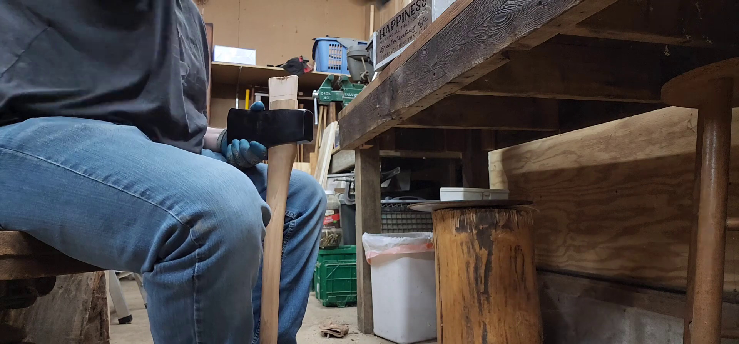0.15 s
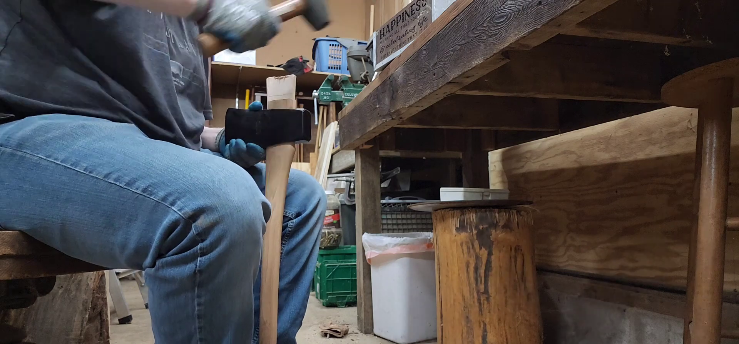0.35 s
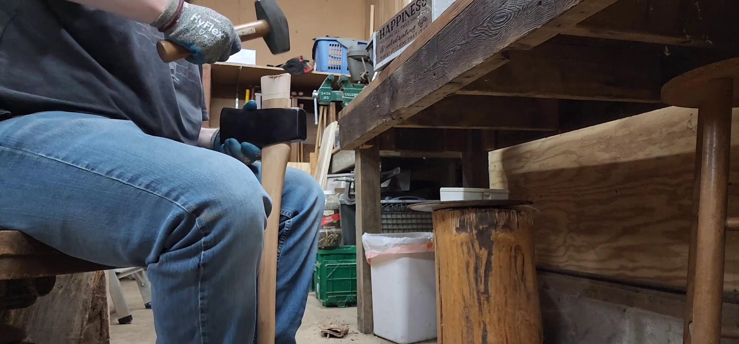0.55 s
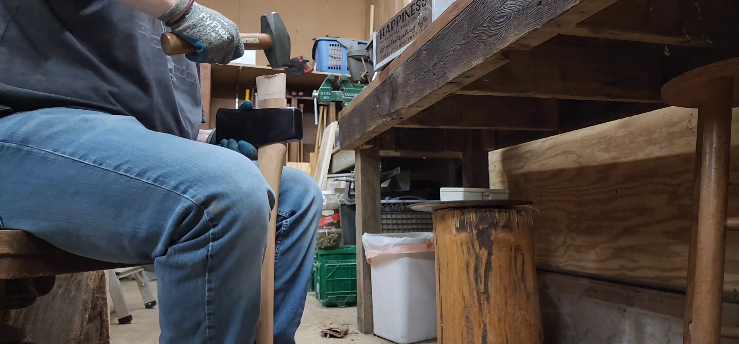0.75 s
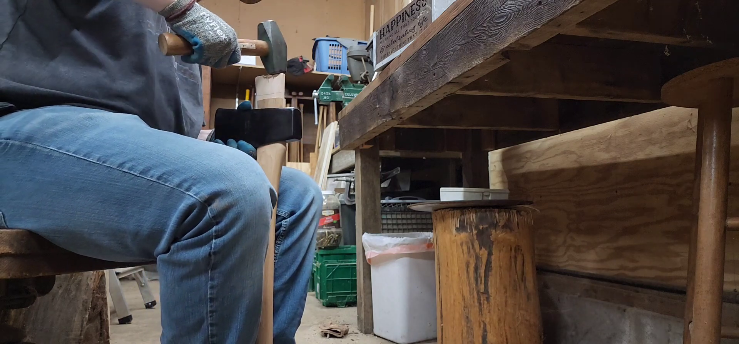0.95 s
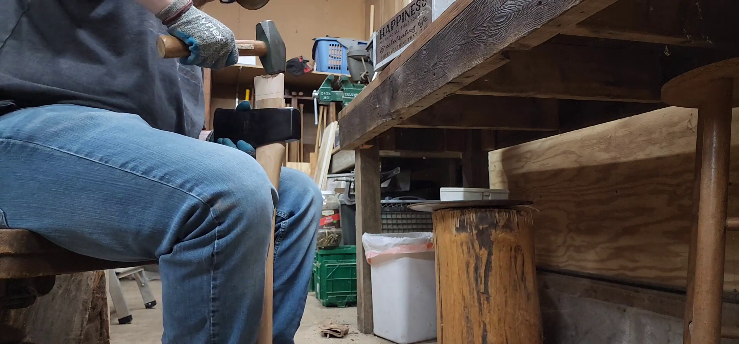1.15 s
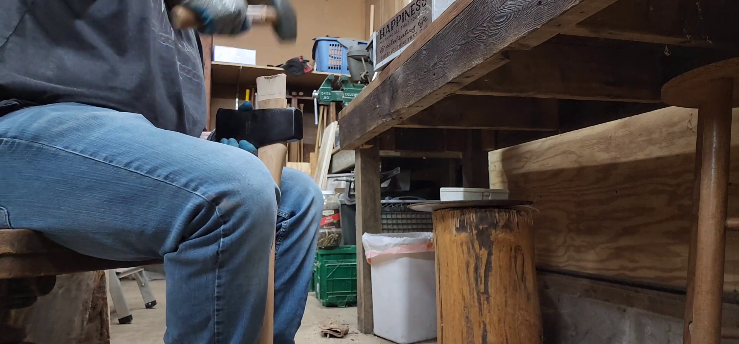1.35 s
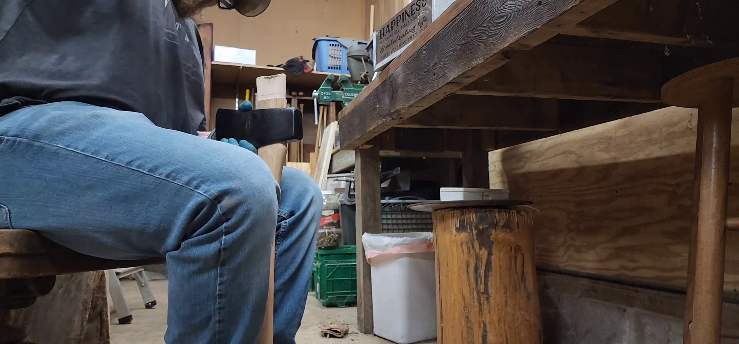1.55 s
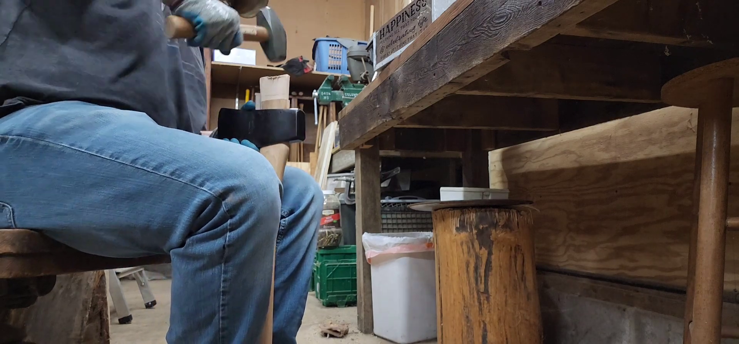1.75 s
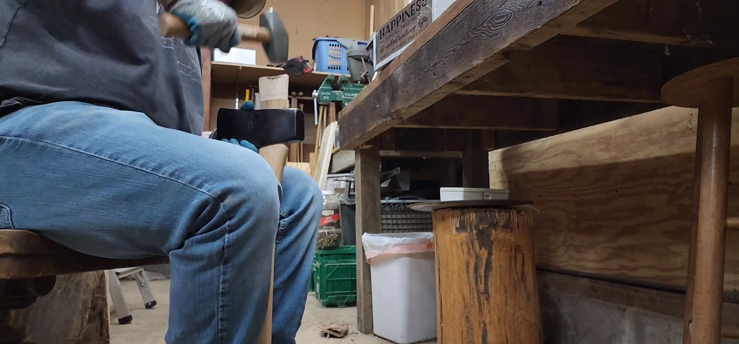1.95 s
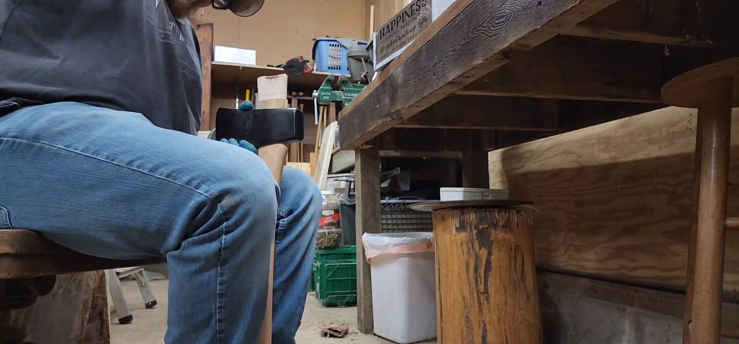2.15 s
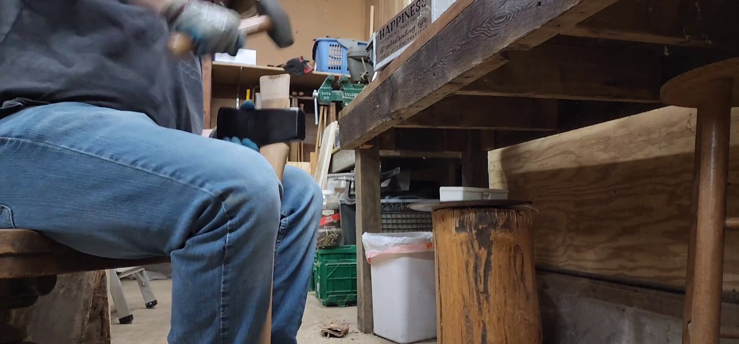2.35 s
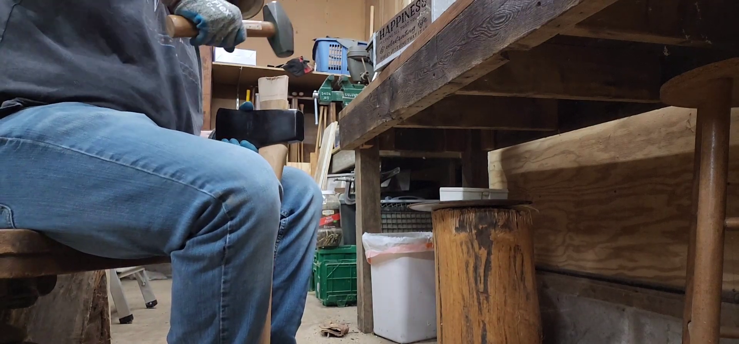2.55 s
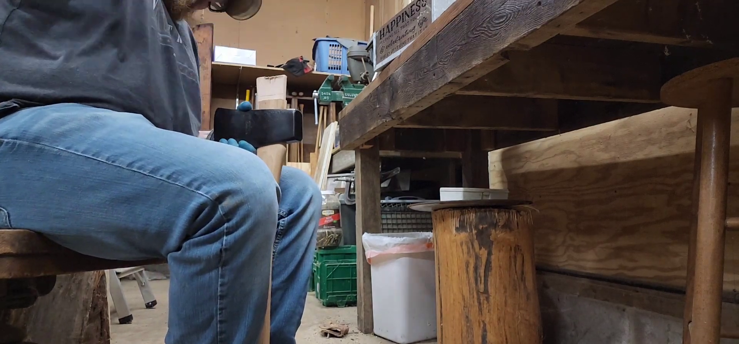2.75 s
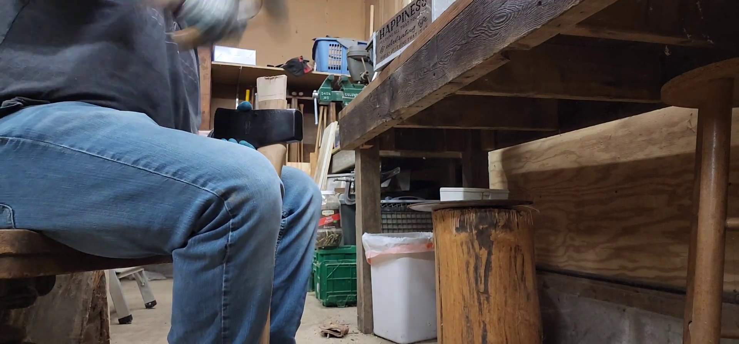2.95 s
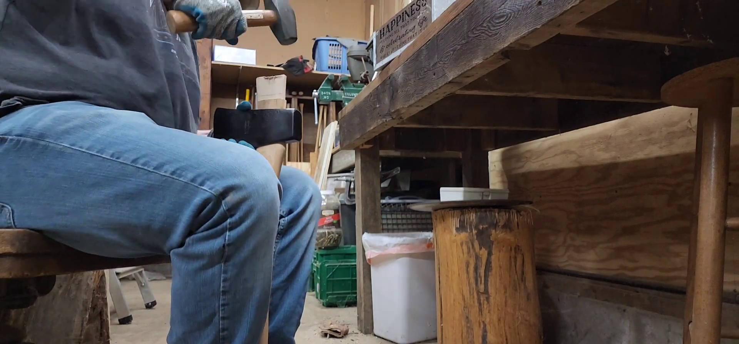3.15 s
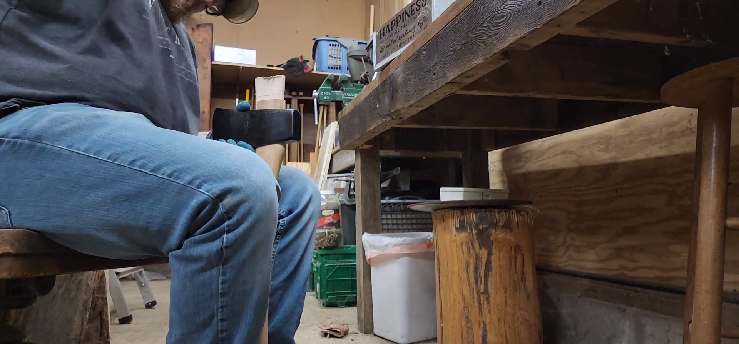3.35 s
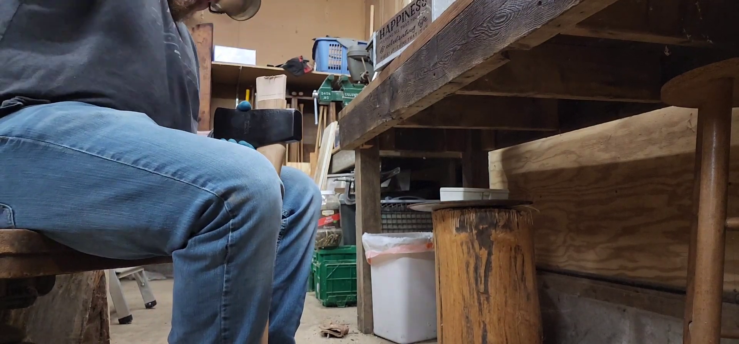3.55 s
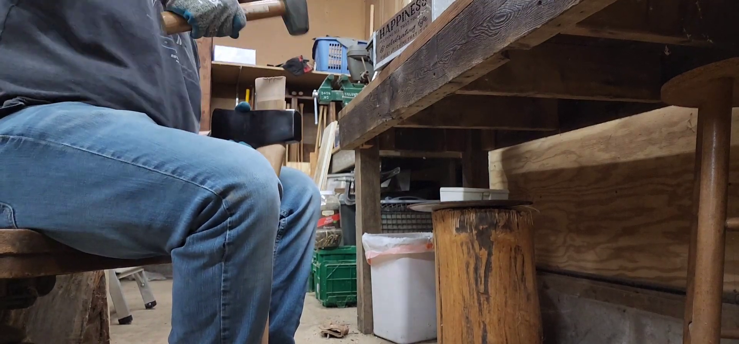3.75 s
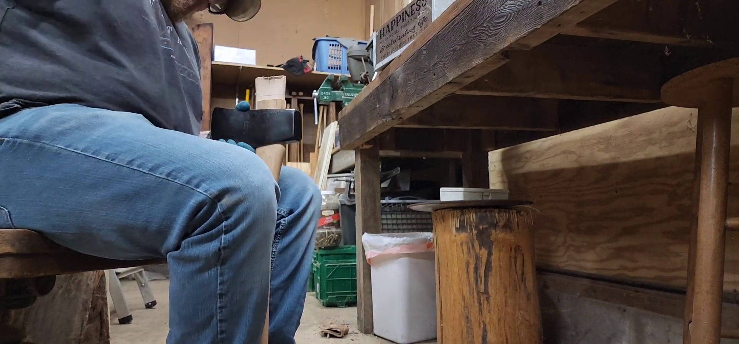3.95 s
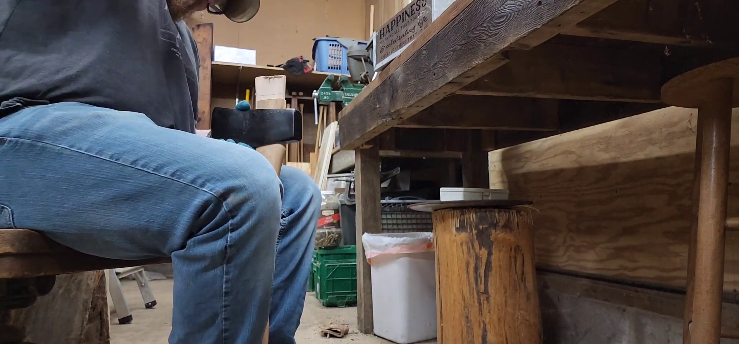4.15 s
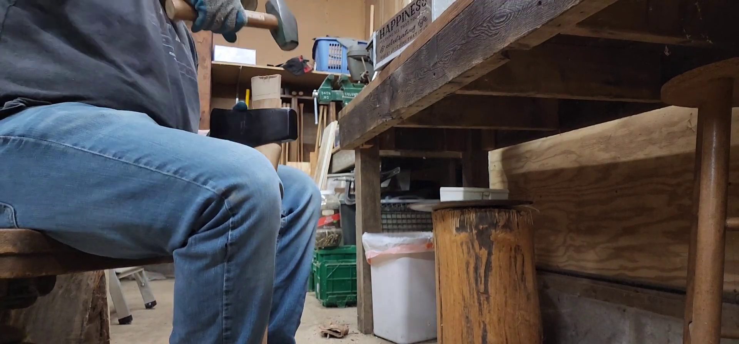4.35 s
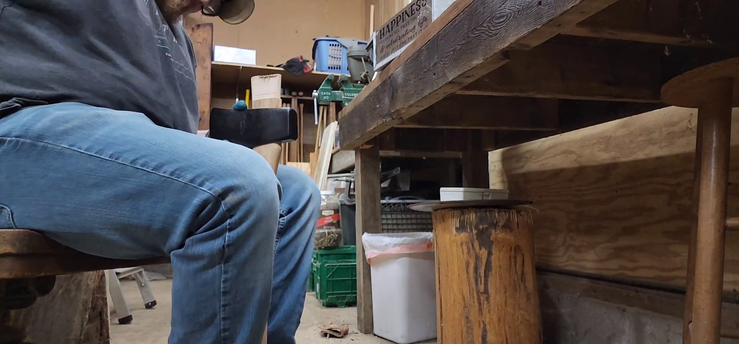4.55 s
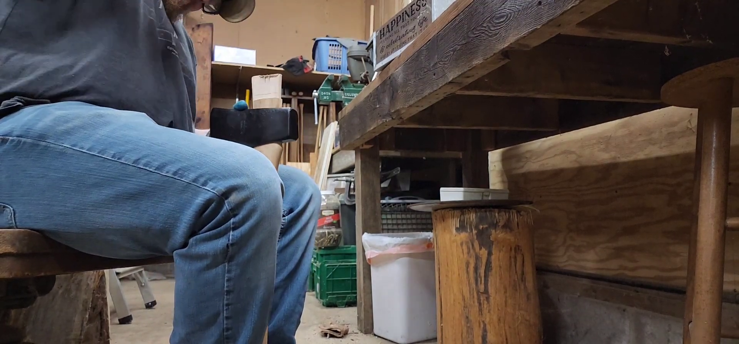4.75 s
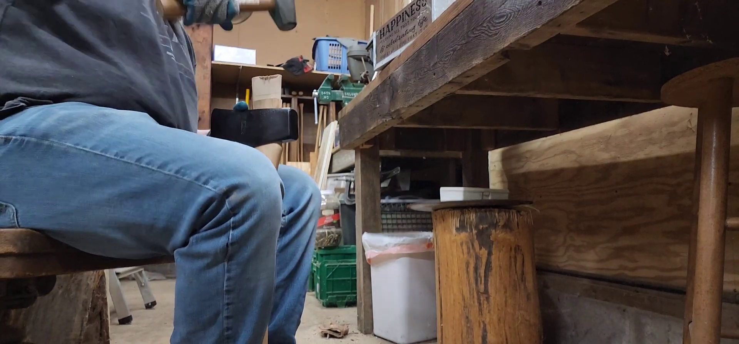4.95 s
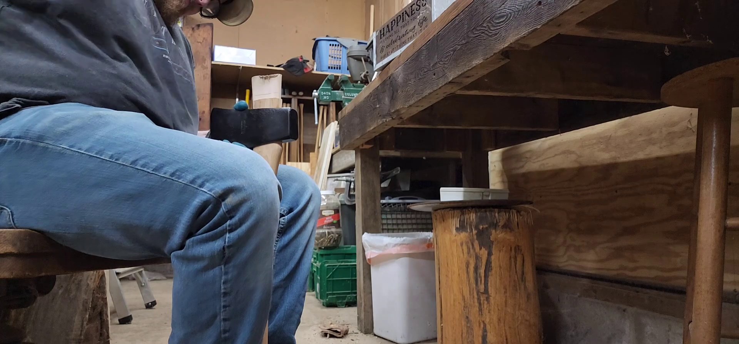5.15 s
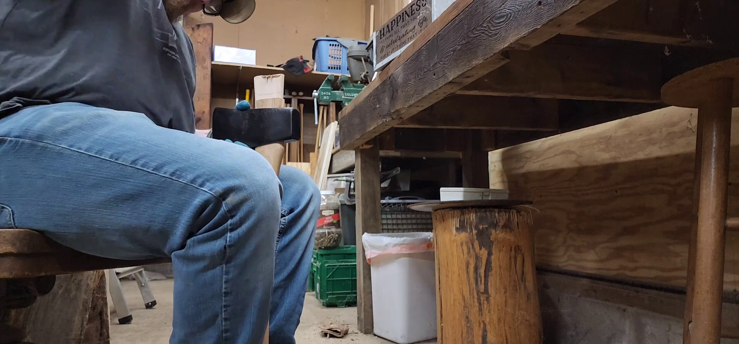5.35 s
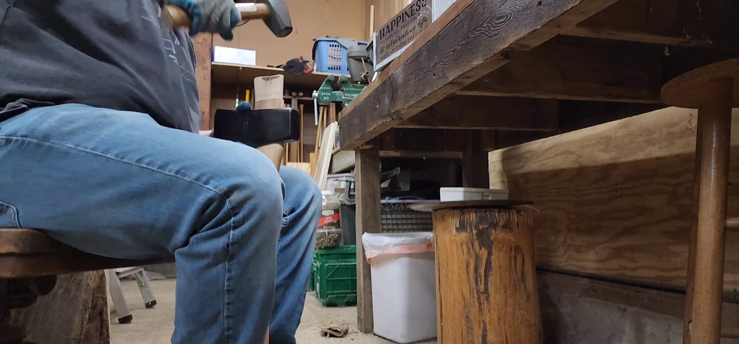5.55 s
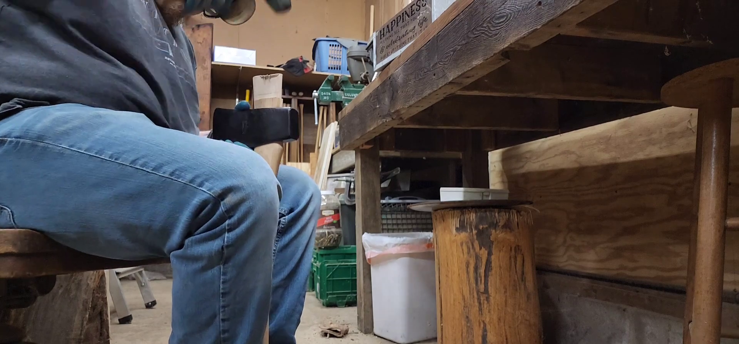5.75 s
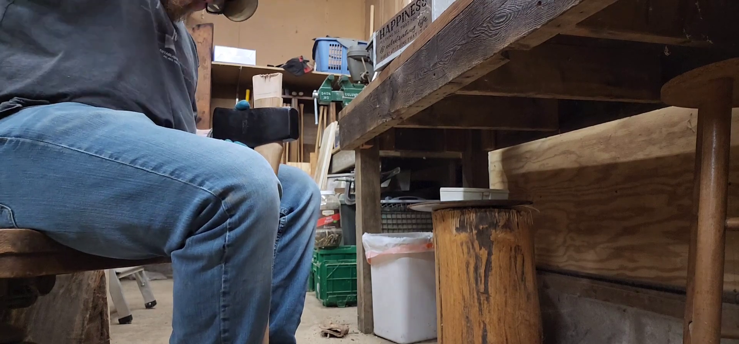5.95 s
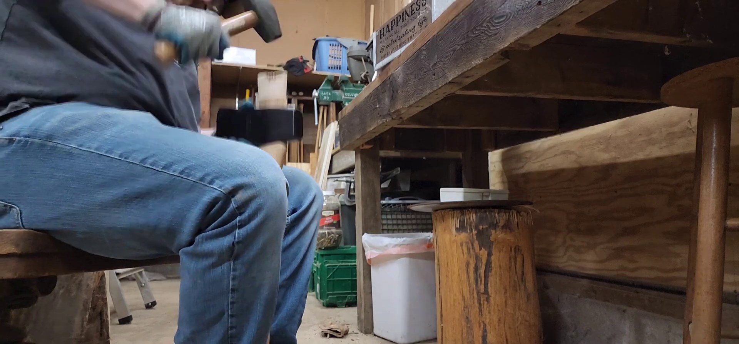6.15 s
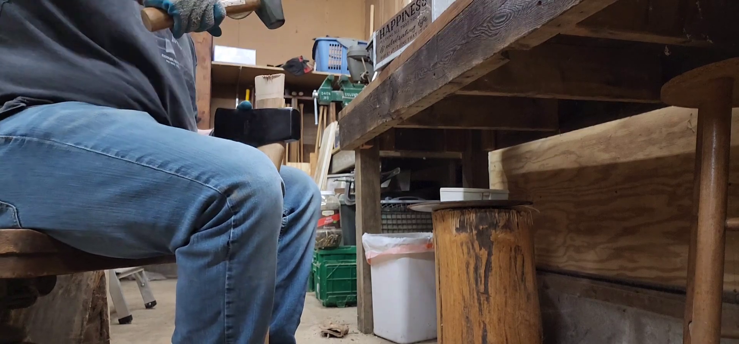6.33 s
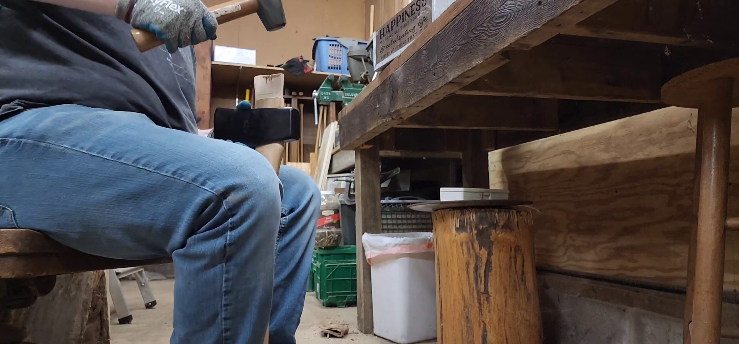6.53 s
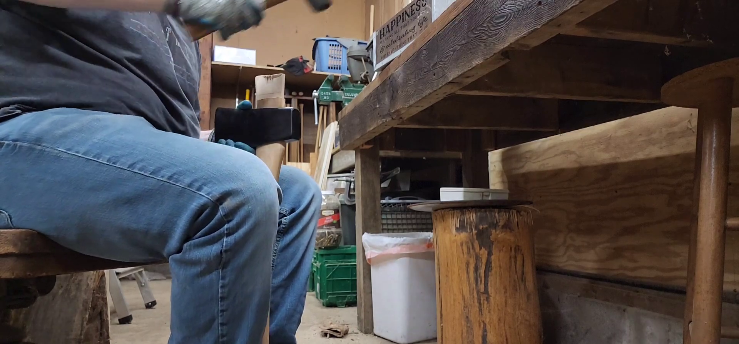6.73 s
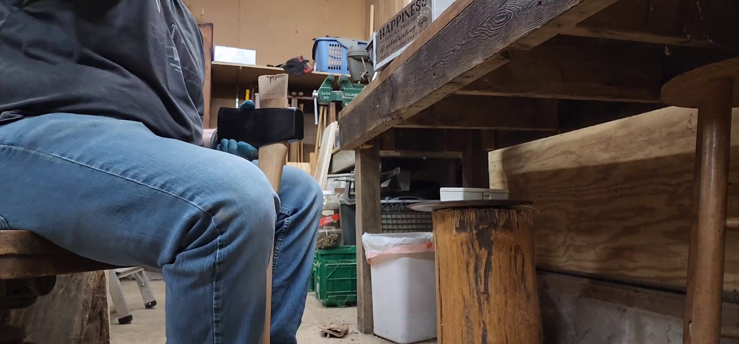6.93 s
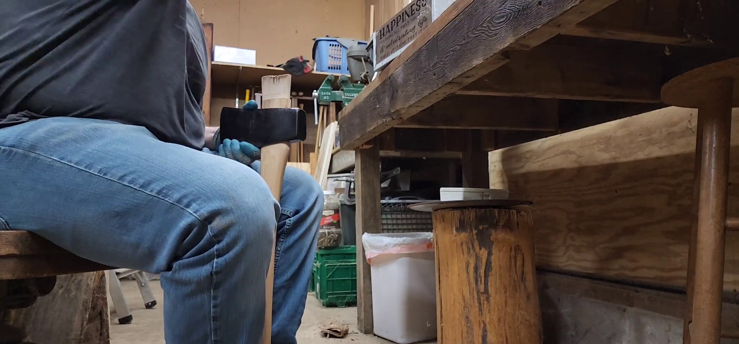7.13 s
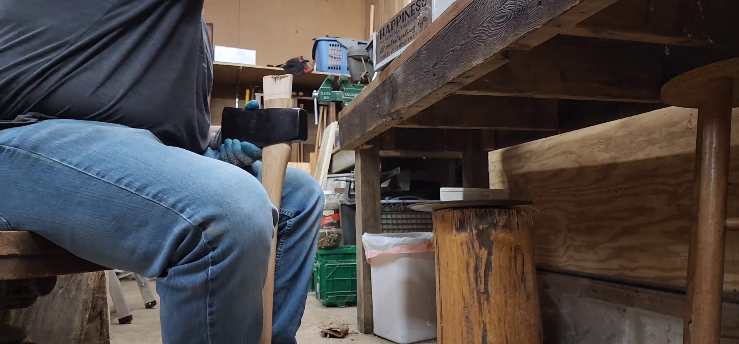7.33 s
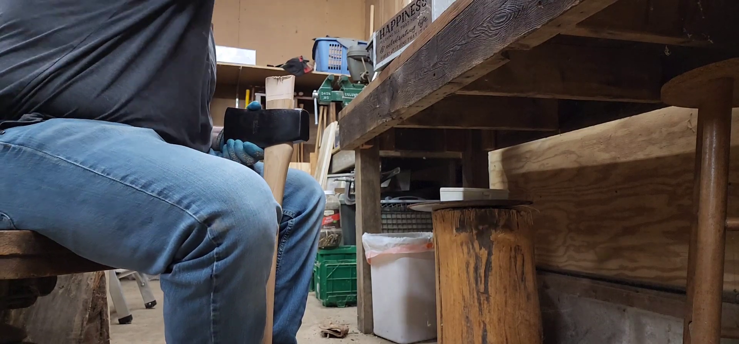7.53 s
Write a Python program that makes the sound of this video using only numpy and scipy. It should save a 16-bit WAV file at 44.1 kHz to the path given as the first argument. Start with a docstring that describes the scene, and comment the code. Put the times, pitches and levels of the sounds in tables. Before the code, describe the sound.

A heavy hammer taps once, then drives a wooden wedge into an axe handle with eight sharp, booming blows, and thuds onto a bench.

```python
"""A small workshop hums faintly; then a heavy hammer drives a wooden wedge into the handle of an axe.
One aiming tap, then eight hard blows: each is a crack, a boom through handle and floor and a ring of the
axe head, and they sound drier as the wedge seats. At the end the hammer thuds onto the bench and rings.
An automatic gain control drops with the first blows and holds the room noise down from then on."""
import sys
import numpy as np
from scipy import signal
from scipy.fft import rfft, irfft
from scipy.io import wavfile
from scipy.ndimage import uniform_filter1d

SR = 44100
rng = np.random.default_rng(int(sys.argv[2]) if len(sys.argv) > 2 else 0)


def store_pcm(level_fs):
    """Save levels as 16-bit WAV."""
    pcm = np.round(np.clip(level_fs, -1, 1) * 32767).astype(np.int16)
    wavfile.write(sys.argv[1], SR, np.atleast_2d(pcm).T)


N = 334719
T = np.arange(SR) / SR  # the second after an impact
HZ = np.fft.rfftfreq(SR, 1 / SR)

# bed of air noise: (frequency [Hz], relative density [dB])
AIR_SPECTRUM = [(25, -18), (49, -3.5), (90, -10), (130, -6), (236, -6.5), (320, -14), (750, -17.5),
                (1400, -20.5), (2000, -29.5), (4400, -37.5), (7600, -39.5), (10000, -49), (16000, -52.5)]
# mains and motor hum: (frequency [Hz], level [dB])
HUM_LINES = [(59.2, -59), (122.5, -48.5), (178, -55.5), (242, -51), (419.9, -58), (764.4, -62.5)]
# reverb decay: (frequency [Hz], t60 [s])
ROOM_DECAY = [(50, 0.81), (150, .52), (400, 0.5), (1000, 0.45), (2500, 0.47), (5000, .41), (8000, 0.4),
              (14000, 0.23)]
# reverb colour: (frequency [Hz], gain [dB])
ROOM_EQ = [(30, -4.5), (100, 5.5), (200, -0.5), (450, 2), (900, -1.5), (1300, -4), (2200, -4), (5000, -5),
           (9000, 0.5), (15000, -3.5)]
# slaps off floor and bench: (delay [s], gain [ratio], extra delay on the left [s])
NEAR_ECHOES = [(.0042, .25, .0002), (.0066, 0.23, -0.0047), (.0092, 0.2, .00025), (0.0139, .4, -.0001)]
# small handling ticks: (time [s], level [dB], centre [Hz])
HANDLING_TICKS = [(3.826, -49.5, 13000), (4.149, -48, 2470)]
# hammer laid on the bench, head then handle: (time [s], thud [dB], steel ring [dB])
BENCH_KNOCKS = [(7.3059, -5, -65), (7.3126, -6, -48), (7.354, -15.5, -53), (7.5214, -15, -72),
                (7.527, -10.5, -79)]
# hammer on wedge: (time [s], force [dB], crack [dB], centre of the snap [Hz])
HAMMER_BLOWS = [(0.814, -15, -8, 2700), (0.8466, -31, 5.5, 8900), (1.6358, 7, -1.5, 1910),
                (2.2956, 11.5, -2.5, 3060), (2.9635, 15, -3, 8900), (3.591, 13.5, -4.5, 6500),
                (4.2233, 15, -4, 3700), (4.8279, 14.5, -4, 4700), (5.4418, 15, -4, 4950),
                (6.0829, 15.5, -4, 13140)]
# bench thud, the handle's woody grain, the wedge's crack: (frequency [Hz], relative density [dB])
THUD_SPECTRUM = [(30, -9), (70, -6), (150, -0.5), (260, 2), (480, -2), (800, -9), (1500, -14), (3000, -27),
                 (6000, -39.5), (15000, -72)]
GRAIN_SPECTRUM = [(100, -21), (380, -4.5), (600, -2), (900, 3.5), (1400, -2), (2100, -14.5), (4000, -25),
                  (15000, -46)]
CRACK_SPECTRUM = [(100, -25.5), (500, -13.5), (1000, -3.5), (1600, 4.5), (2200, -3.5), (3000, -3),
                  (4800, -2.5), (6200, -8.5), (7800, -10.5), (10000, -19.5), (12000, -7), (15500, -13.5)]
# resonances of each struck body: (frequency [Hz], relative level [dB], t60 [s])
BENCH_MODES = [(106, -13, .45), (253.6, 19, 0.2), (320.4, -21, .4), (482, 1, 0.45), (790, -13, 0.27)]
HAMMER_MODES = [(4086, 5, 0.48), (4926, -3.5, 0.79), (6060, -4, 0.53), (7530, 3.5, 0.53), (8000, -4, 0.48),
                (9100, -8.5, 0.22), (9900, -7, 0.45), (10820, -5.5, 0.51), (13170, -3, 0.4),
                (14800, -5, .23)]
HANDLE_FLOOR_MODES = [(53.3, -7.5, 0.91), (77.5, 1, 0.36), (98, -12, 0.46), (138.33, 0, 0.44),
                      (156.6, -12, .45), (161.4, -9.5, 0.74), (226.7, 1.5, 0.36), (246.6, -6.5, 0.32),
                      (296.3, 2.5, 0.46), (363, -7, 0.29), (417, -22.5, .34), (436.3, 3.5, 0.31),
                      (473.5, -4.5, 0.51), (529.5, -2, .28), (595, -4, 0.37), (645, -10.5, 0.57)]
AXE_MODES = [(1650, -7, 0.13), (1696, -6.5, 0.41), (2532, -14, .46), (4463, -20.5, .33)]
WEDGE_MODES = [(582.6, -4, 0.062), (672, -9.5, 0.071), (794.5, -3, 0.074), (910, -2.5, 0.08),
               (981, -1.5, 0.06), (1104, 3.5, 0.055), (1257, -5, 0.082), (1390, -3.5, 0.019),
               (1600, -5, 0.013), (1990, -5.5, 0.026)]

FULL_FORCE_DB = 14  # a full swing of the hammer


def amp(db):
    """Decibels to gain."""
    return 10 ** (np.asarray(db) / 20)


def unit(x):
    """Scales to rms 1."""
    return x / np.sqrt(np.mean(x ** 2) + 1e-20)


def curve(points, hz):
    """Reads a table on a log-frequency axis."""
    f, value = np.transpose(points)
    return np.interp(np.log(hz + 1), np.log(f + 1), value)


def add(mix, start_s, sound):
    """Drops a stereo sound into the mix."""
    part = mix[:, round(start_s * SR):][:, :sound.shape[1]]
    part += sound[:, :part.shape[1]]


def ring(modes):
    """A struck body as dying sines; neighbouring modes start in opposite directions."""
    return sum((-1) ** k * amp(db - 60 * T / t60) * np.sin(2 * np.pi * hz * T)
               for k, (hz, db, t60) in enumerate(modes))


def burst(spectrum_db, t60, linger=0, linger_t60=0.1):
    """A short, coloured spray of micro-impacts, with the energy of 10 ms at rms 1."""
    log_gain = np.log(amp(np.r_[spectrum_db, spectrum_db[-2:0:-1]]))
    colour = np.exp(np.conj(signal.hilbert(log_gain)))[:len(HZ)]  # minimum phase keeps the attack sharp
    envelope = amp(-60 * T / t60) + linger * amp(-60 * T / linger_t60)
    spray = rfft(rng.standard_normal(SR) * envelope)
    spray /= np.sqrt(uniform_filter1d(abs(spray) ** 2, size=130))  # flat, so the colour sets the timbre
    return unit(irfft(spray * colour) * (T < .5)) / 10


def diffuse(pair, spacing_m=0.18):
    """Spectra of sound from all sides at two spaced microphones: centred bass, wide treble."""
    a, b = rfft(pair)
    hz = np.fft.rfftfreq(pair.shape[1], 1 / SR)
    coherence = np.sinc(2 * hz * spacing_m / 343)
    mid, side = a * np.sqrt((1 + coherence) / 2), b * np.sqrt((1 - coherence) / 2)
    return hz, np.array([mid + side, mid - side])


def room_tone(air_db=-42.5, waver=0.38):
    """The bed: steady air noise under a mains and motor hum that wavers in level and phase."""
    hz, noise = diffuse(rng.standard_normal((2, N)))
    air = amp(air_db) * unit(irfft(noise * amp(curve(AIR_SPECTRUM, hz)), N))
    t = np.arange(N) / SR
    knots = np.linspace(0, t[-1], 50)
    hum = 0
    for line_hz, db in HUM_LINES:
        swell, slip = (np.interp(t, knots, k) for k in waver * rng.standard_normal((2, len(knots))))
        hum += amp(db) * np.sqrt(2) * (1 + swell) * np.sin(2 * np.pi * line_hz * t + 2 * slip)
    return air + hum


def workshop(sound, tail_db=-2, build_s=0.0035):
    """The space: direct sound, a few near echoes and a diffuse tail whose treble dies first."""
    hz, t, noise = signal.stft(rng.standard_normal((2, SR)), SR, nperseg=256)
    decay = amp(-60 * t / curve(ROOM_DECAY, hz)[:, None])
    tail = signal.istft(noise * decay, SR, nperseg=256)[1][:, :SR]
    _, tail = diffuse(tail * (1 - np.exp(-(T / build_s) ** 2)))
    tail /= np.sqrt(uniform_filter1d(np.mean(abs(tail) ** 2, 0), size=80))  # flat ahead of the EQ
    direct = (0.00079, 0.55, -.00013)  # arrives on the left first
    paths = sum(gain * np.exp(-2j * np.pi * HZ * np.array([[delay + left_lag], [delay]]))
                for delay, gain, left_lag in [direct, *NEAR_ECHOES])
    response = irfft(paths + tail * amp(tail_db + curve(ROOM_EQ, HZ)))[:, :-SR // 10]
    return signal.fftconvolve(sound[None], response, axes=1)[:, :len(sound)]


def handling_tick(centre_hz):
    """A tiny tick of handling, its spectrum peaked around one frequency."""
    return burst(-10 * abs(np.log2((HZ + 100) / centre_hz)), t60=.015)


def steel_shimmer(modes, depth):
    """Long steel tones reach each microphone by many paths, so each swells and fades on its own."""
    noise = rng.standard_normal((len(modes), 2, SR))
    drifts = uniform_filter1d(uniform_filter1d(noise, size=500), size=200)
    return sum((1 + depth * unit(drift)) * ring([mode]) for drift, mode in zip(drifts, modes))


def bench_knock(thud_db, steel_db, plank_db=-20):
    """The hammer lands on the bench: a dull thud, and both the plank and the steel head ring."""
    thud = workshop(burst(curve(THUD_SPECTRUM, HZ), t60=0.021))
    plank = amp(plank_db) * ring(BENCH_MODES)
    return amp(thud_db) * (thud + plank) + amp(steel_db) * steel_shimmer(HAMMER_MODES, depth=2.3)


def floor_boom(force_db, full_swing_db=-23.5, rise_s=0.0015):
    """The low end: the shock runs down the handle and sets the floor swinging."""
    shove_db = full_swing_db - 0.07 * (force_db - FULL_FORCE_DB)  # a soft blow passes on a larger share
    return amp(shove_db) * ring(HANDLE_FLOOR_MODES) * (1 - np.exp(-T / rise_s))


def wedge_ring(slack, loose_db=-12.5, seated_db=-29, seated_rise=0.05, scatter=0.025):
    """As its slack goes from 1 to 0 the wedge stiffens: it rings less, and a little higher."""
    detune = scatter * rng.standard_normal(len(WEDGE_MODES))  # no blow lands on quite the same spot
    pitch = 1 + seated_rise * (1 - slack) + detune
    ring_db = seated_db + slack * (loose_db - seated_db)
    return ring([(hz * p, db + ring_db, t60) for p, (hz, db, t60) in zip(pitch, WEDGE_MODES)])


def hammer_blow(grain, force_db, crack_db, snap_hz, push_s=0.00056, push_db=-3, crack_trim_db=-11.5):
    """The attack: the axe is shoved down, sucking then pushing the air; the wedge cracks and slides in."""
    u = (T - .0014) / push_s
    push = amp(push_db) * u * np.exp((1 - u ** 2) / 2)
    db_per_octave = -1.6 + 0.04 * (force_db - FULL_FORCE_DB)  # a soft blow cracks duller
    tilt_db = db_per_octave * np.log2((HZ + 100) / 3000)
    snap_db = 4.5 * np.exp(-(np.log2((HZ + 1) / snap_hz) / 0.37) ** 2)  # a bell boost pitches the snap
    crack = burst(curve(CRACK_SPECTRUM, HZ) + tilt_db + snap_db, t60=0.0042, linger=.15)
    return push + amp(crack_db + crack_trim_db) * (crack + grain)


def scene(axe_ring_db=-22, seating_per_force=0.05):
    """The mix: impacts echo round the workshop; floor, bench and steel ring on over the room tone."""
    mix = np.zeros((2, N))
    grain = burst(curve(GRAIN_SPECTRUM, HZ), t60=.02)  # the handle's short modes, alike at every blow
    slack = 1
    for start_s, force_db, crack_db, snap_hz in HAMMER_BLOWS:
        impact = hammer_blow(grain, force_db, crack_db, snap_hz) + wedge_ring(slack)
        axe_head = amp(axe_ring_db + crack_db) * steel_shimmer(AXE_MODES, depth=0.29)
        add(mix, start_s, amp(force_db) * (workshop(impact) + floor_boom(force_db) + axe_head))
        slack *= np.exp(-seating_per_force * amp(force_db))  # a harder blow takes up more slack
    for start_s, thud_db, steel_db in BENCH_KNOCKS:
        add(mix, start_s, bench_knock(thud_db, steel_db))
    for start_s, db, centre_hz in HANDLING_TICKS:
        add(mix, start_s, amp(db) * workshop(handling_tick(centre_hz)))
    return mix + room_tone()


def record(dry, threshold_db=-10, slope=0.92, release_db_per_s=3.5, sink=0.41, sink_s=1.2, top_hz=16100):
    """Gain control ducks at once, sinks further and recovers slowly; then a soft clip and a low-pass."""
    power_db = 10 * np.log10(abs(uniform_filter1d((dry ** 2).mean(0), size=700)) + 1e-12)
    release_db = release_db_per_s * np.arange(N) / SR
    held_db = np.maximum.accumulate(power_db + release_db) - release_db
    cut_db = slope * np.maximum(held_db - threshold_db, 0)
    pole = np.exp(-1 / (sink_s * SR))
    cut_db += sink * signal.lfilter([1 - pole], [1, -pole], cut_db)  # a sustained cut deepens
    ducked = dry * amp(-uniform_filter1d(cut_db, size=200))
    rounded = ducked / (1 + ducked ** 8) ** (1 / 8)
    lowpass = signal.firwin(401, top_hz, window=("kaiser", 8), fs=SR)
    return signal.oaconvolve(rounded, lowpass[None], "same", axes=1)


dry = scene()
out = record(dry)
store_pcm(out)
```